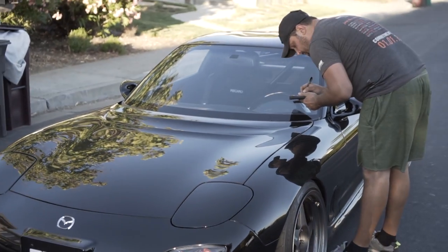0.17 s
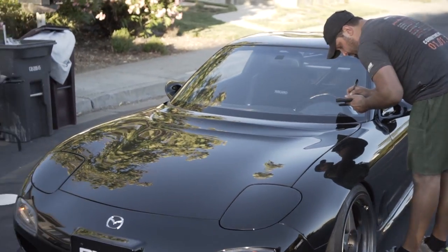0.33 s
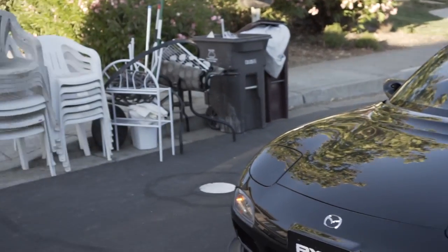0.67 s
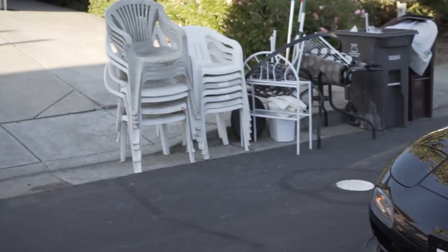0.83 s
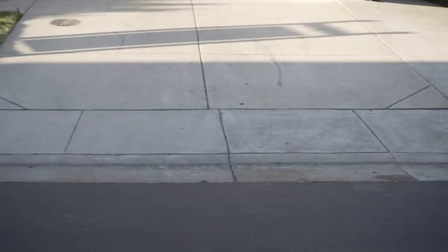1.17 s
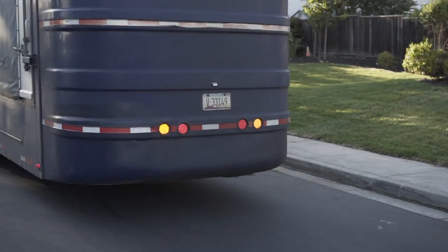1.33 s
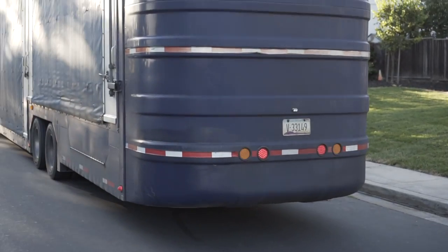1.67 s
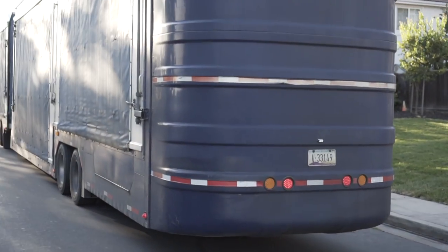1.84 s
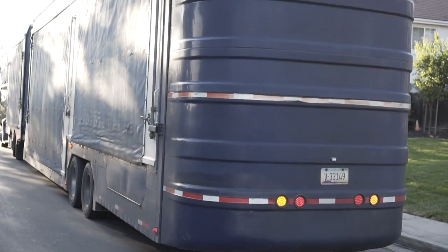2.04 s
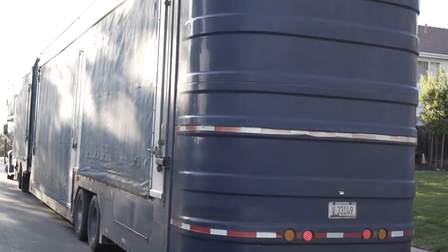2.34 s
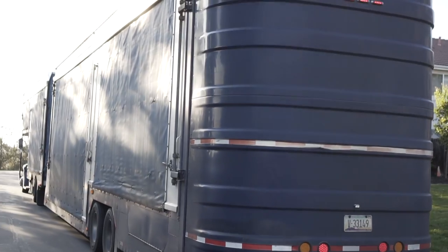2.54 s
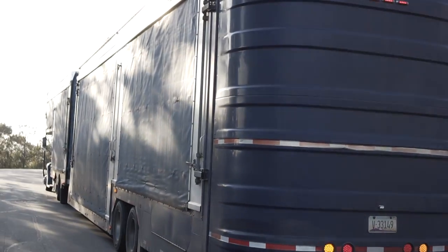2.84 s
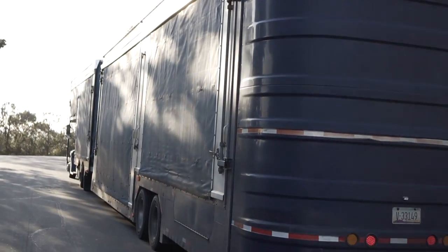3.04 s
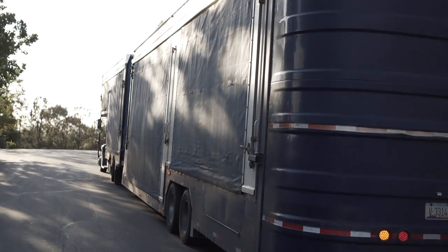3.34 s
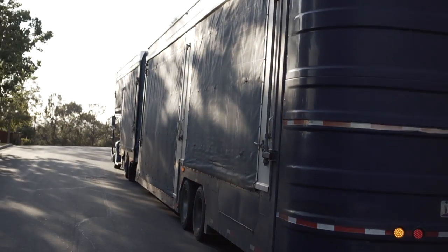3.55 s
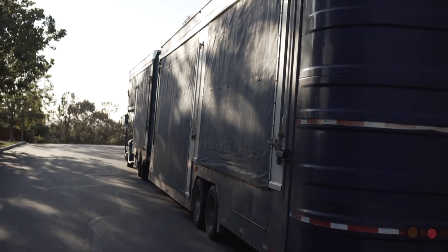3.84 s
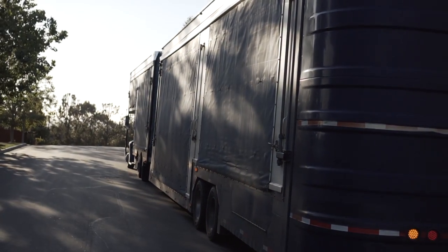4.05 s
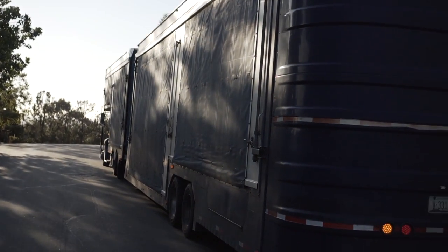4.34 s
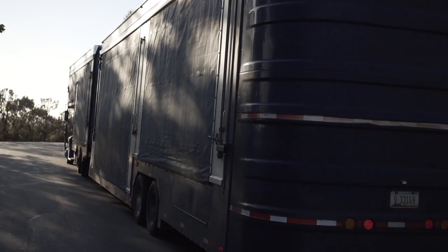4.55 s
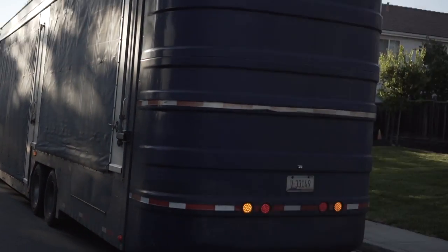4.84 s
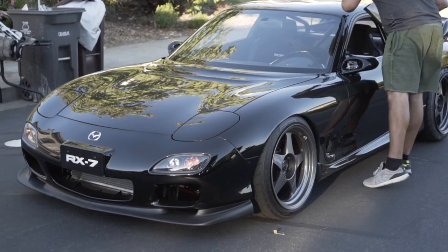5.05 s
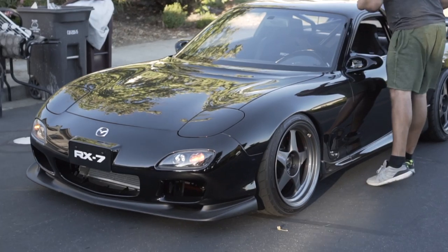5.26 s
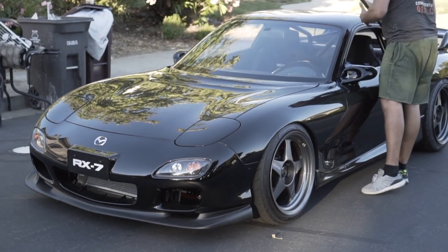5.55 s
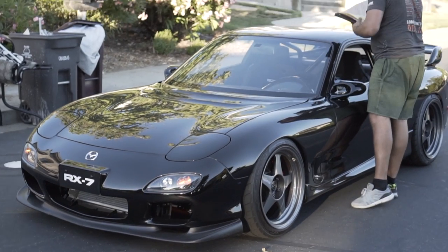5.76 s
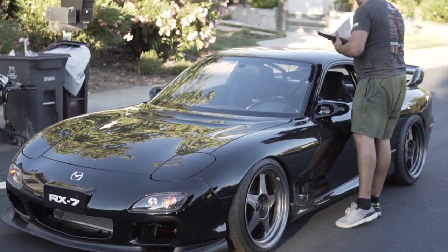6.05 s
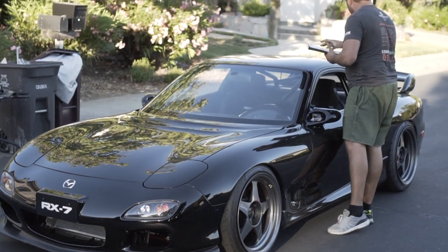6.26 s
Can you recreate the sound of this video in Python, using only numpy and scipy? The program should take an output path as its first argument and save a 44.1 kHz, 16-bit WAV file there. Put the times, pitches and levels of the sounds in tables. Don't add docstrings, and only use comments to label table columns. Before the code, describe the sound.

A lumpy engine idle throbs close by, its low hum wavering in pitch, with wind rumbling hard across an unprotected microphone. The sound switches abruptly to a steady generator drone with thin whine and soft airy roar, swelling gently as the listener moves closer, the idle now blurred behind it. It snaps back to the close car, the boom weaker and the wind distorting heavily.

```python
import sys
import numpy as np
from scipy import signal
from scipy.fft import rfft, irfft, next_fast_len
from scipy.io import wavfile
from scipy.ndimage import uniform_filter1d

SR = 44100
rng = np.random.default_rng(int(sys.argv[2]) if len(sys.argv) > 2 else 0)


def voltage_ratio(level):
    return 10 ** (np.asarray(level, float) / 20)


def transcribe(signal):
    frames = np.atleast_2d(signal).T
    limited = np.clip(frames, -1, 1)
    pcm = np.round(limited * 32767).astype(np.int16)
    wavfile.write(sys.argv[1], SR, pcm)


N = 282681

VIEW_CHANGES_S = [
    1.331,
    5.0852,
]

# time in seconds, pitch in Hz.
IDLE = [(0, 121.6), (.3, 124.8), (.75, 121.2), (.9, 125.3), (1.33, 121.6), (1.7, 126), (2.4, 125),
        (2.7, 118.5), (3.0, 120.4), (3.55, 127.2), (3.8, 123.3), (5.0, 123.4), (5.2, 125.5), (5.4, 127),
        (5.6, 122), (6.0, 129.1), (6.2, 124.4), (6.41, 129.4)]
# peak in seconds, level in dB, length in seconds.
SURGES_NEAR = [(.125, -9, 0.14), (.29, -10, 0.188), (.435, -7.5, 0.1448), (.5, -15.5, 0.085),
               (.59, -6, 0.12), (.755, -9, .17), (.884, -8.5, 0.094), (1.034, -9.5, 0.1),
               (1.165, -13.5, 0.084), (1.296, -12.5, .13), (5.2, -12.5, 0.091), (5.372, -18.5, .17),
               (5.52, -23.5, 0.17), (5.645, -10, 0.145), (5.8, -12.5, 0.154), (5.935, -13.5, 0.14),
               (6.07, -18, 0.14), (6.23, -17.5, 0.17), (6.375, -17.5, 0.15)]
# peak in seconds, level in dB.
SURGES_FAR = [(1.39, -27.5), (1.5, -30), (2.08, -34.5), (1.6, -28), (1.76, -25.5), (2.23, -27.5),
              (2.361, -26), (2.48, -25), (2.69, -20), (2.82, -28), (2.95, -22), (3.11, -20), (3.3, -18),
              (3.43, -23.5), (3.58, -25.5), (3.75, -22.5), (3.89, -25.5), (4.02, -21.5), (4.16, -19.5),
              (4.3, -24.5), (4.45, -23), (4.6, -20.5), (4.75, -20.5), (4.9, -23.5)]
SMEARED_S = 0.22
BETWEEN_NEAR_DB, BETWEEN_FAR_DB = -26.5, -37.5
FIRINGS_PER_BOOM = 4
# multiple of the firing rate, level near in dB, level far in dB.
EXHAUST_ORDERS = [(2, -25, -15), (3, -11.5, -10), (5, -18, -16.5), (6, -19.5, -33.5), (7, -26, -29)]

# rattle in dB, hiss in dB, fading in dB per second as we turn.
BAY_VIEWS = [
    (-32.5, -43, -1),
    (-30.5, -46, -1),
]
# peak in seconds, level in dB, length in seconds.
SHAKES = [
    (.6, -35, 0.2),
    (.75, -40, 0.15),
    (.925, -36, 0.091),
    (1.3, -37, 0.066),
    (5.1, -35, 0.034),
    (5.53, -41, 0.079),
    (5.73, -36, 0.11),
    (5.3, -40.5, 0.22),
]
# peak in seconds, depth in dB, length in seconds.
DUCKS = [
    (1.1, -2.5, 0.08),
    (1.186, -3.5, 0.027),
    (6.047, -1.5, 0.079),
    (6.314, -4, 0.041),
]
# frequency in Hz, level in dB.
RATTLE = [(110, -2), (190, -9), (318, -6.5), (395, -12.5), (507, -14.5), (667, -21.5), (734, -21.5),
          (1300, -29.5), (1690, -53), (2860, -120)]
# frequency in Hz, level in dB.
HISS_FIRST = [(590, -3.5), (1000, -4.5), (1110, -4), (1430, -5.5), (1820, -8.5), (2130, -9.5),
              (2310, -10.5), (2650, -8), (4010, -13.5), (4500, -14.5), (5930, -20), (8090, -17),
              (10200, -27), (12500, -25.5), (15600, -36)]
# frequency in Hz, level in dB.
HISS_LAST = [(590, -17), (1000, -3.5), (1120, -6), (1260, -6), (1350, -7), (1740, -4), (1900, -7.5),
             (2230, -6.5), (3080, -7.5), (3460, -7), (5230, -17.5), (8270, -16.5), (9940, -26.5),
             (12100, -24), (15600, -34)]

# peak in seconds, level in dB, length in seconds.
GUSTS = [(.02, -38, 0.082), (.17, -22, 0.14), (.42, -15, 0.24), (.65, -6.5, 0.23), (.82, -7, 0.18),
         (.97, -9, 0.31), (1.12, -13.5, 0.39), (1.22, -8.5, 0.22), (1.38, -17.5, 0.18), (1.6, -11.5, .25),
         (2.25, -17, 0.26), (2.46, -19, 0.091), (2.68, -19, 0.18), (3.25, -11.5, 0.17), (3.45, -18, 0.13),
         (3.8, -23, 0.33), (4.47, -10, .2), (4.65, -16.5, .2), (5.09, -3, 0.051), (5.17, -4.5, .1),
         (5.33, -9, 0.22), (5.5, -7, 0.22), (5.75, -12, 0.37), (5.97, -2, 0.099), (6.08, -8.5, .12),
         (6.23, -3, .2), (6.4, -4, 0.18)]
# peak in seconds, level in dB, length in seconds.
EDDIES = [(.19, -25, 0.085), (.56, -25, 0.08), (.67, -26, 0.12), (.77, -19, 0.1), (.92, -16, 0.23),
          (1.05, -22.5, .15), (1.2, -18, 0.091), (1.3, -20.5, .1), (1.42, -33, 0.22), (1.95, -32, .15),
          (1.73, -25, 0.089), (2.16, -17.5, 0.078), (2.29, -19, .1), (2.53, -34, .08), (3.26, -27, .1),
          (3.54, -17.5, 0.087), (3.83, -23, 0.079), (4.0, -32, 0.1), (4.58, -20, 0.15), (5.09, -9.5, 0.079),
          (5.23, -14, .12), (5.42, -19.5, 0.19), (5.57, -17, 0.19), (5.76, -20, 0.35), (5.9, -11.5, 0.18),
          (6.0, -19, .1), (5.31, -31, .1), (5.48, -27, 0.12), (6.13, -13.5, 0.091), (6.26, -23.5, 0.27)]
LULL_NEAR_DB, LULL_FAR_DB = -22.5, -21.5
STILL_NEAR_DB, STILL_FAR_DB = -26, -28.5
# frequency in Hz, level in dB.
RUMBLE_NEAR = [(3, -26), (7, 16), (12, -3.5), (25, 9), (40, -23), (60, -39)]
# frequency in Hz, level in dB.
BUFFET_NEAR = [(25, -8), (38, -5.5), (60, -1.5), (85, -5), (115, -24), (140, -13.5), (170, -21), (260, -25),
               (340, -87)]
# frequency in Hz, level in dB.
RUMBLE_FAR = [(3, -66), (7, -17.5), (12, -0.5), (21, -23), (30, -12.5), (42, -24), (60, -53)]
# frequency in Hz, level in dB.
BUFFET_FAR = [(30, 15.5), (42, -9.5), (65, -5), (105, -1.5), (140, -16), (180, -16), (230, -14.5),
              (330, -33)]

# time in seconds, nearness in dB, extra treble from facing it in dB.
WALK = [
    (1.34, -35, 5.5),
    (2.3, -33.5, 3),
    (3.3, -32, 1.5),
    (4.4, -30, 1),
    (4.9, -30, 4.5),
    (5.08, -30, 4.5),
]
# peak in seconds, level in dB, length in seconds.
LOADS = [
    (1.55, -31, .2),
    (1.95, -35.5, 0.4),
    (2.3, -38, 0.33),
    (2.89, -27.5, .3),
    (3.42, -30, 0.14),
    (3.68, -28.5, 0.25),
    (4.2, -29, 0.53),
    (4.85, -25.5, 0.45),
    (5.03, -32, .2),
]
SHAFT_HZ, SLOT_HZ, BLOWER_HZ = 43.55, 191.1, 571.8
# multiple of the shaft rate, level in dB.
SHAFT_ORDERS = [(1, -6), (1.25, -15), (1.7, -13), (2, 0), (3, -8), (4, -19)]
# multiple of the slot rate, level in dB.
SLOT_ORDERS = [(1, 0), (2, -14), (4, -21.5)]
# multiple of the blower rate, level in dB.
BLOWER_ORDERS = [(1, -19), (2, -20), (3, -30), (4, -32), (5, -28)]
# frequency in Hz, width in Hz, level against the roar in dB.
WHISTLES = [(325, 45, -19), (530, 6, -21), (674, 6, -23), (708, 10, -23), (841, 5, -20.5), (1044, 6, -21),
            (1189, 8, -23), (1218, 12, -22), (1551, 25, -20), (1600, 20, -24), (1683, 10, -27),
            (2260, 30, -29), (1949, 8, -29), (1980, 8, -28), (2887, 6, -32), (2930, 5, -30), (2974, 5, -30)]
# frequency in Hz, level in dB.
ROAR = [(120, -35), (200, -7), (223, -17), (315, -12.5), (352, -14.5), (378, -16.5), (488, -16.5),
        (555, -17), (642, -18.5), (1170, -18), (1430, -21.5), (2960, -26.5), (3830, -33.5), (10000, -52.5),
        (15600, -65.5)]
DRONE_OVER_DB, WHINE_OVER_DB = 3.5, 2.04
WHINE_FOLLOWS = 1.32
WHINE_HIDDEN_DB, WHINE_CLEARS_S = -15, 0.26

OPENING_DB, SPLICE_DB = -5, -15
HEADROOM = 1.6


def rms_one(x):
    return x / np.sqrt(np.mean(x ** 2) + 1e-20)


def in_time(table):
    s, *columns = np.array(table).T
    return [np.interp(np.arange(N) / SR, s, c) for c in columns]


def swells(rows, between_db):
    t = np.arange(0, N + 40, 40) / SR
    humps = 0
    for s, db, length in rows:
        humps = humps + voltage_ratio(db) * np.cos(np.pi * np.clip((t - s) / length, -.5, .5)) ** 2
    return voltage_ratio(between_db) + np.interp(np.arange(N) / SR, t, humps)


def drift(rate):
    r = np.exp(-80 * np.pi * rate / SR)
    noise = rng.standard_normal(N // 40 + 2002)
    slow = signal.lfilter([1], [1, -2 * r, r * r], noise)[2000:]
    return np.interp(np.arange(N) / 40, np.arange(len(slow)), rms_one(slow))


def coloured(spectrum, shared_db, own_db, rate):
    size = next_fast_len(N)
    hz = np.maximum(np.arange(size // 2 + 1) * SR / size, 1)
    point_hz, point_db = np.array(spectrum).T
    colour = voltage_ratio(np.interp(np.log(hz), np.log(point_hz), point_db, left=-120, right=-120))
    noise = colour * rfft(rng.standard_normal(size))
    together = drift(rate)
    out = 0
    for octave in range(int(np.log2(point_hz[0])), int(np.log2(point_hz[-1])) + 2):
        share = np.clip(1 - abs(np.log2(hz) - octave), 0, 1)
        flicker = voltage_ratio(shared_db * together + own_db * drift(rate))
        out = out + irfft(noise * share, size)[:N] * flicker
    return rms_one(out)


def partial(turns, wobble_db, rate):
    return np.sqrt(2) * voltage_ratio(wobble_db * drift(rate)) * np.sin(2 * np.pi * (turns + rng.random()))


def exhaust(far):
    boom_hz, = in_time(IDLE)
    smeared = [(s, db, SMEARED_S) for s, db in SURGES_FAR]
    surge = np.where(far, swells(smeared, BETWEEN_FAR_DB), swells(SURGES_NEAR, BETWEEN_NEAR_DB))
    slope_db_per_s = np.gradient(20 * np.log10(surge)) * SR
    swelling = uniform_filter1d(np.tanh(slope_db_per_s / 150), size=2600)
    sag_hz = np.where(far, 1.5, 9)
    firing = np.cumsum(boom_hz + sag_hz * swelling) / SR / FIRINGS_PER_BOOM
    out = voltage_ratio(-2.6) * surge * partial(FIRINGS_PER_BOOM * firing, wobble_db=1.24, rate=27)
    behind = uniform_filter1d(far * 1., size=400)
    mean_surge = uniform_filter1d(surge, size=9000)
    for multiple, near_db, far_db in EXHAUST_ORDERS:
        leak = partial(multiple * firing, wobble_db=3.5, rate=8.3)
        out += voltage_ratio(near_db + (far_db - near_db) * behind) * mean_surge * leak
    return out, firing


def engine_bay(firing, last):
    since = np.arange(N) / SR - last * VIEW_CHANGES_S[1]
    rattle_db, hiss_db, fading_db = np.array(BAY_VIEWS)[last * 1].T
    hiss = np.where(last, coloured(HISS_LAST, 0.39, 0.25, 15), coloured(HISS_FIRST, 0.78, 0.78, 20))
    hiss = voltage_ratio(hiss_db + fading_db * since + 6.0) * hiss
    beat = np.cos(2 * np.pi * firing)
    rattle = swells(SHAKES, rattle_db) * voltage_ratio(0.5 * beat) * coloured(RATTLE, 0.66, 0.36, 12)
    duck_db = sum(swells([(s, 0, length)], -90) * db for s, db, length in DUCKS)
    return voltage_ratio(0.33 * beat) * voltage_ratio(duck_db) * (rattle + hiss)


def wind(far):
    behind = uniform_filter1d(far * 1., size=400)
    near = 1 - behind
    gusts = swells(GUSTS, LULL_NEAR_DB + (LULL_FAR_DB - LULL_NEAR_DB) * behind)
    eddies = swells(EDDIES, STILL_NEAR_DB + (STILL_FAR_DB - STILL_NEAR_DB) * behind)
    rumble = behind * coloured(RUMBLE_FAR, 0.22, .2, 3.3)
    rumble += near * coloured(RUMBLE_NEAR, .2, .2, 3)
    buffet = behind * voltage_ratio(-3.0) * coloured(BUFFET_FAR, 0.89, 0.75, 15.0)
    buffet += near * voltage_ratio(2.5) * coloured(BUFFET_NEAR, 0.32, 1.0, 5.2)
    rumble /= np.sqrt(uniform_filter1d(rumble ** 2, size=8000) + 0.091)
    return voltage_ratio(-2.5) * gusts * rumble + voltage_ratio(-1.5) * eddies * buffet


def whistle(hz, width_hz):
    r = np.exp(-np.pi * width_hz / SR)
    ring = [1, -2 * r * np.cos(2 * np.pi * hz / SR), r * r]
    once = signal.lfilter([1, 0, -1], ring, rng.standard_normal(N))
    return rms_one(signal.lfilter([1], ring, once))


def generator():
    t = np.arange(N) / SR
    roar_db, treble_db = in_time(WALK)
    mean_db = roar_db.mean()
    whine_db = mean_db + WHINE_OVER_DB + WHINE_FOLLOWS * (roar_db - mean_db)
    whine_db += WHINE_HIDDEN_DB * np.clip(1 - (t - VIEW_CHANGES_S[0]) / WHINE_CLEARS_S, 0, 1)
    drone = sum(voltage_ratio(db) * partial(k * SHAFT_HZ * t, wobble_db=-0.7, rate=5.9) for k, db in SHAFT_ORDERS)
    whine = sum(voltage_ratio(db) * partial(k * SLOT_HZ * t, wobble_db=0.5, rate=4) for k, db in SLOT_ORDERS)
    whine += sum(voltage_ratio(db) * partial(k * BLOWER_HZ * t, wobble_db=3, rate=3.2) for k, db in BLOWER_ORDERS)
    knock_db = 0.3 * np.cos(2 * np.pi * SHAFT_HZ * t) + 0.24 * drift(260)
    roar = coloured(ROAR, 0.44, 0.88, 22) * voltage_ratio(knock_db)
    treble = signal.sosfilt(signal.butter(2, 4500, "high", fs=SR, output="sos"), roar)
    roar += (voltage_ratio(treble_db) - 1) * treble
    roar += sum(voltage_ratio(db) * whistle(hz, width_hz) for hz, width_hz, db in WHISTLES)
    out = swells(LOADS, roar_db + DRONE_OVER_DB) * drone
    return out + voltage_ratio(whine_db + 0.3) * whine + voltage_ratio(roar_db + 0.69) * roar


def scene():
    t = np.arange(N) / SR
    last = t >= VIEW_CHANGES_S[1]
    far = (t >= VIEW_CHANGES_S[0]) & ~last
    behind = uniform_filter1d(far * 1., size=60)
    boom, firing = exhaust(far)
    mix = boom + (1 - behind) * engine_bay(firing, last) + wind(far) + behind * generator()
    step = voltage_ratio(SPLICE_DB) * last * np.exp(-np.maximum(t - VIEW_CHANGES_S[1], 0) / 0.0037)
    step -= voltage_ratio(OPENING_DB) * np.exp(-t / .011) * np.cos(2 * np.pi * 112 * t)
    closing = np.clip((N / SR - t) / .008 + .15, 0, 1)
    return ((mix + step) * closing)[None]


def low_pass(x):
    return signal.sosfilt(signal.butter(12, 15710, fs=SR, output="sos"), x)


def record(dry):
    squashed = HEADROOM * np.tanh(dry / HEADROOM)
    return low_pass(np.clip(squashed, -1, 1))


dry = scene()
out = record(dry)
transcribe(out)
```